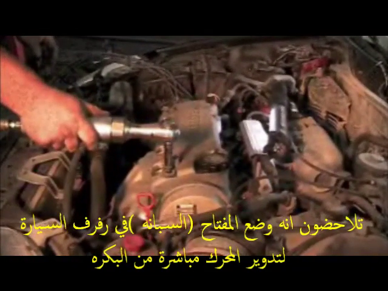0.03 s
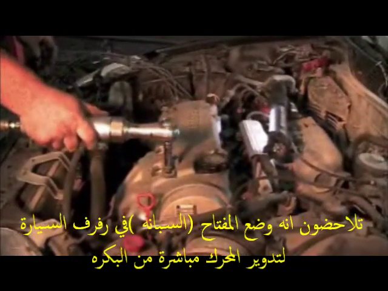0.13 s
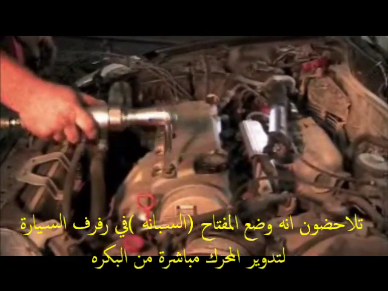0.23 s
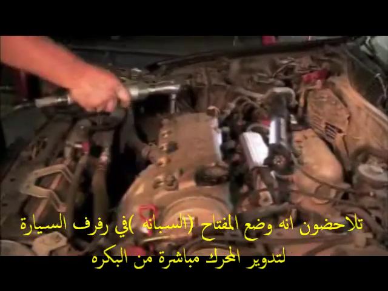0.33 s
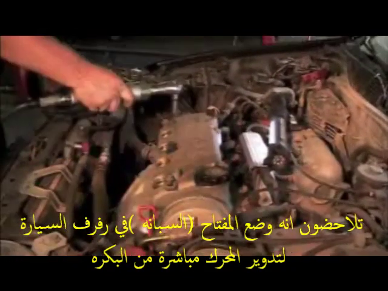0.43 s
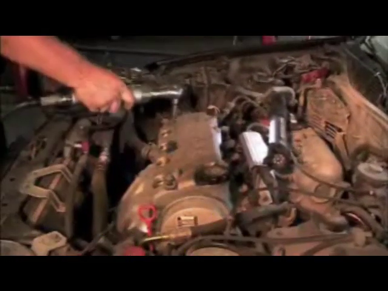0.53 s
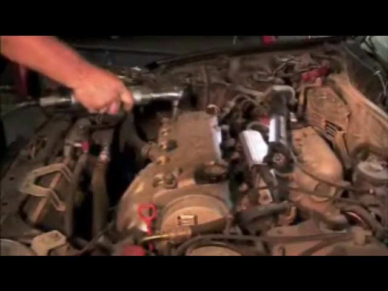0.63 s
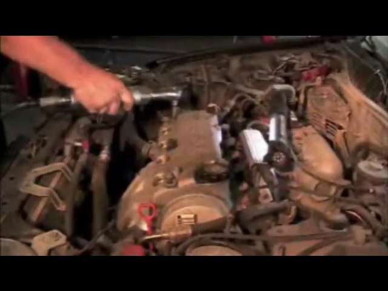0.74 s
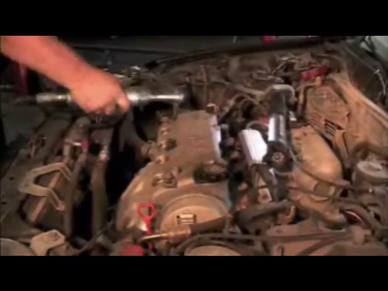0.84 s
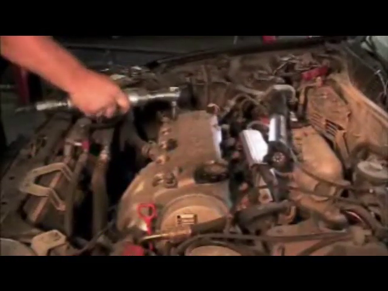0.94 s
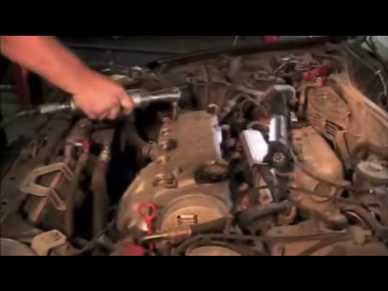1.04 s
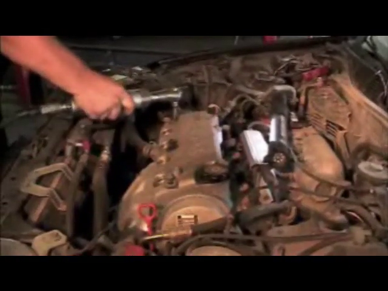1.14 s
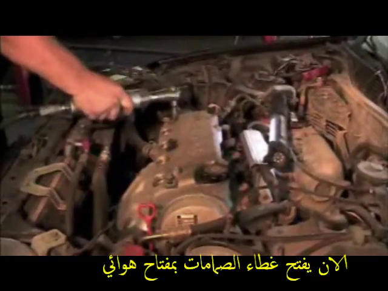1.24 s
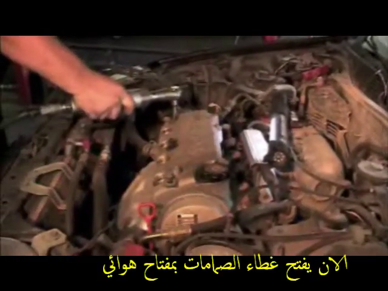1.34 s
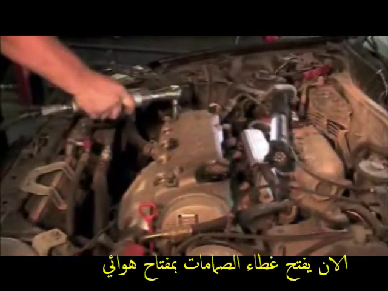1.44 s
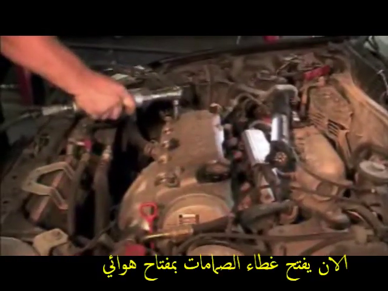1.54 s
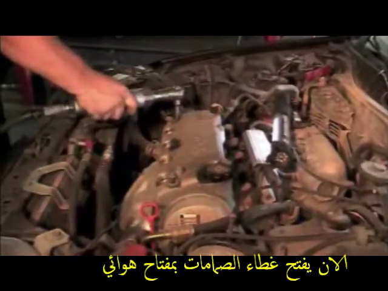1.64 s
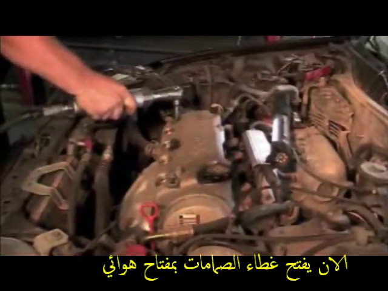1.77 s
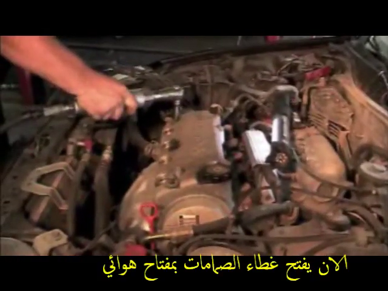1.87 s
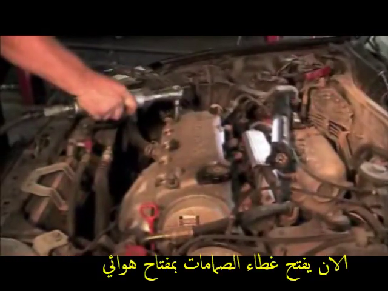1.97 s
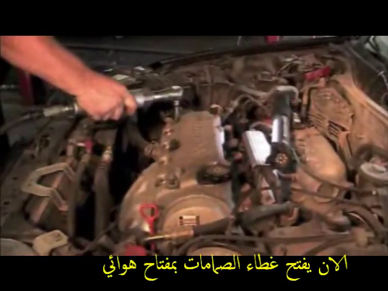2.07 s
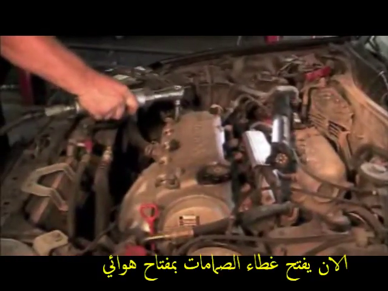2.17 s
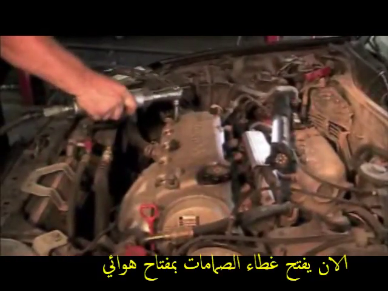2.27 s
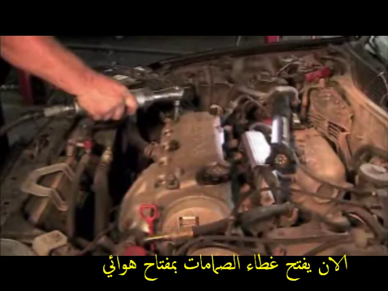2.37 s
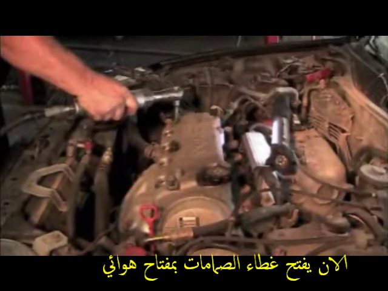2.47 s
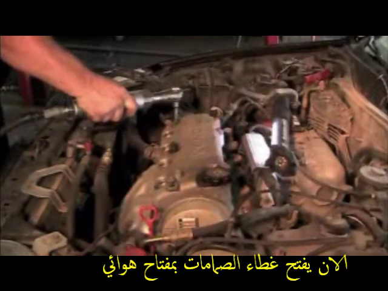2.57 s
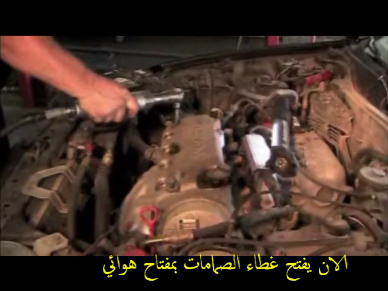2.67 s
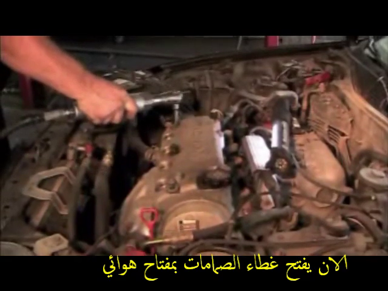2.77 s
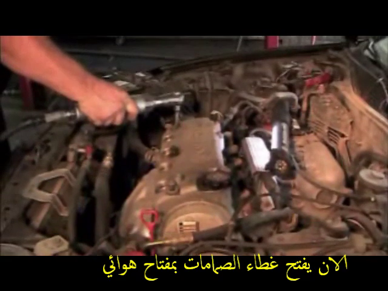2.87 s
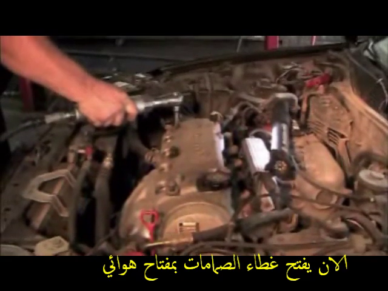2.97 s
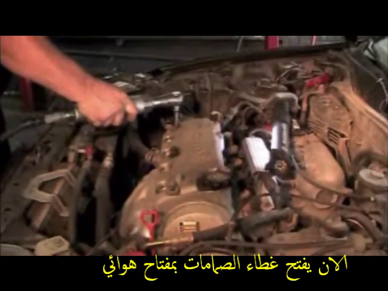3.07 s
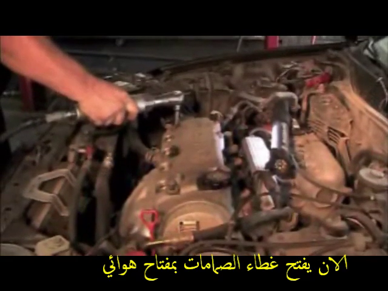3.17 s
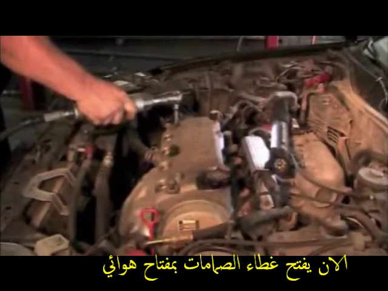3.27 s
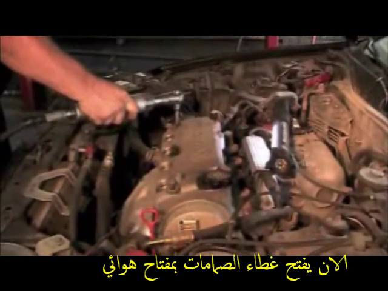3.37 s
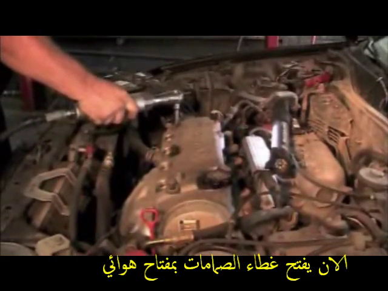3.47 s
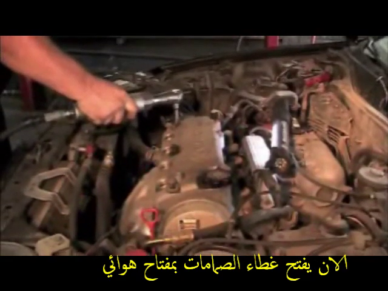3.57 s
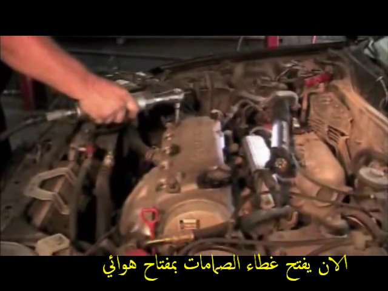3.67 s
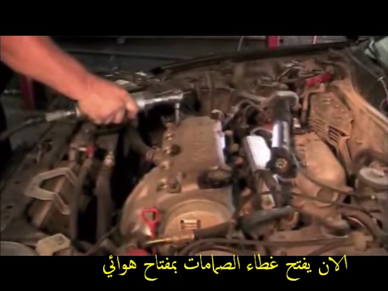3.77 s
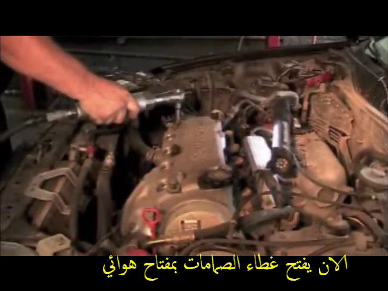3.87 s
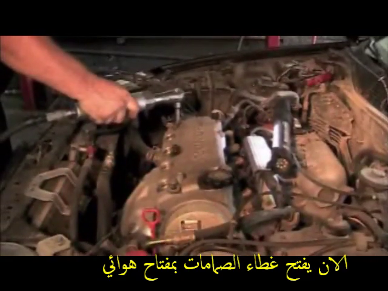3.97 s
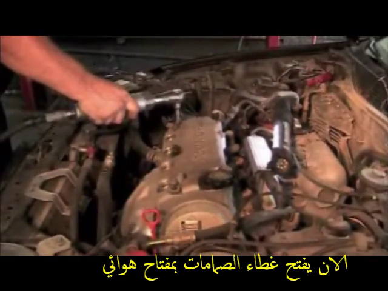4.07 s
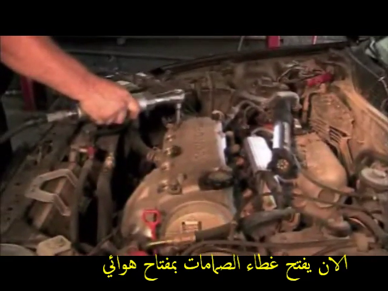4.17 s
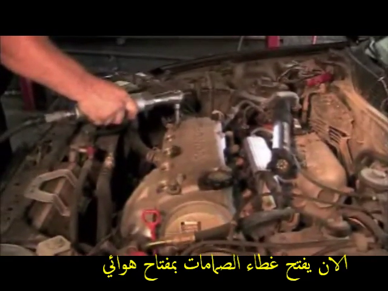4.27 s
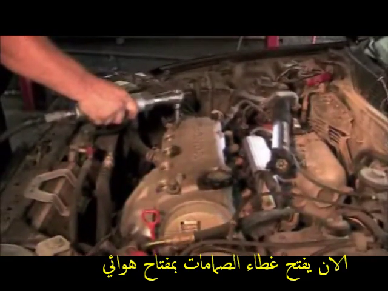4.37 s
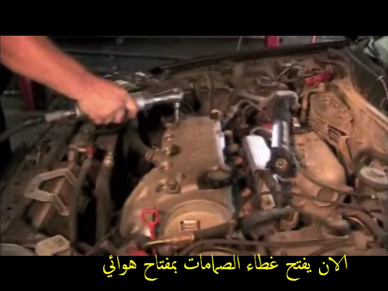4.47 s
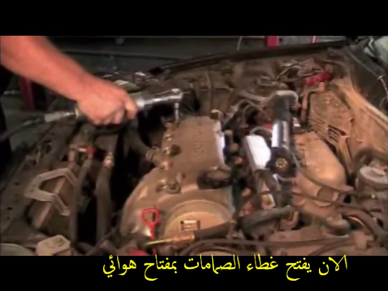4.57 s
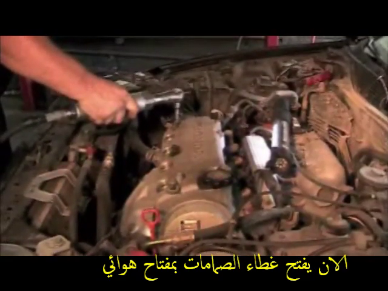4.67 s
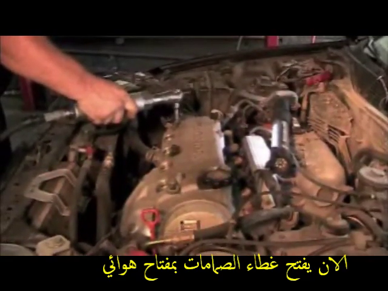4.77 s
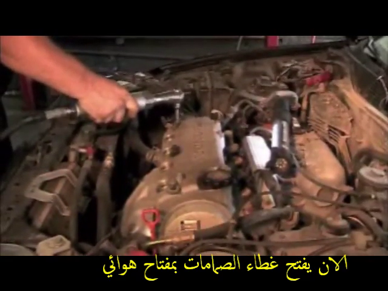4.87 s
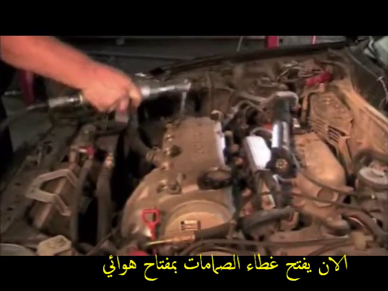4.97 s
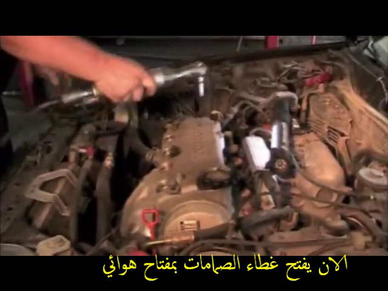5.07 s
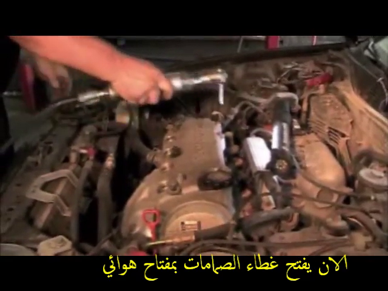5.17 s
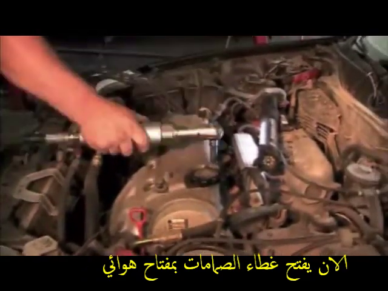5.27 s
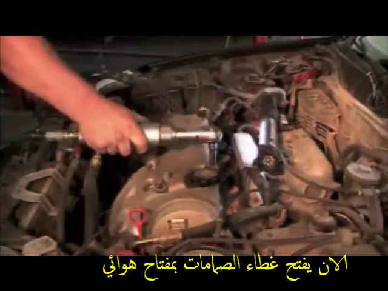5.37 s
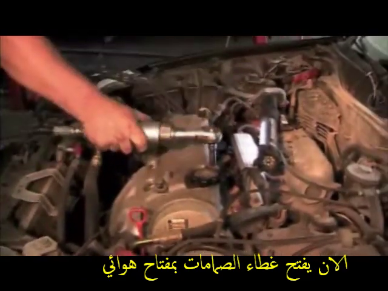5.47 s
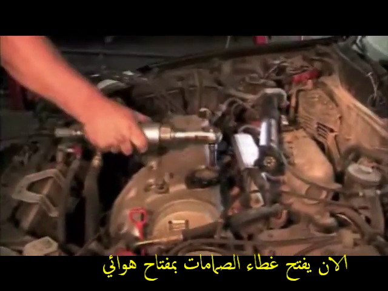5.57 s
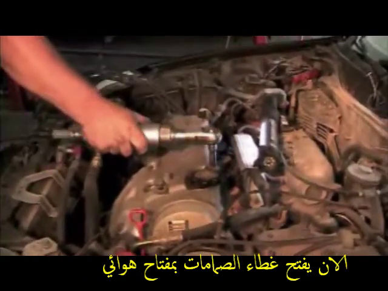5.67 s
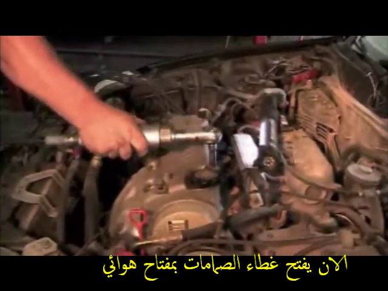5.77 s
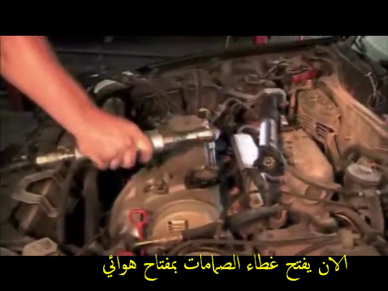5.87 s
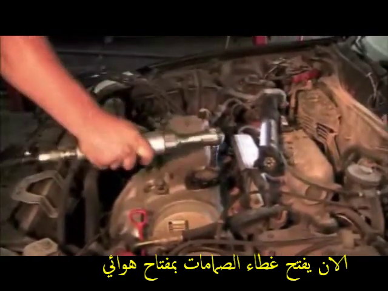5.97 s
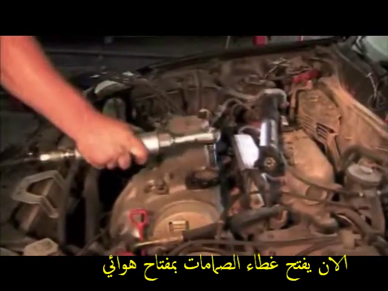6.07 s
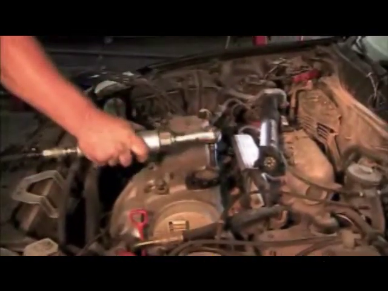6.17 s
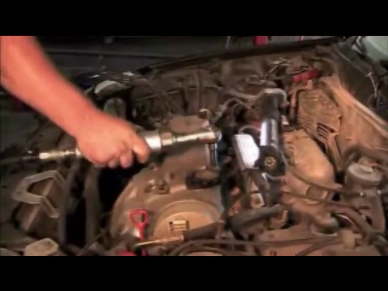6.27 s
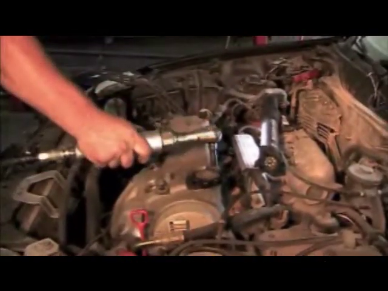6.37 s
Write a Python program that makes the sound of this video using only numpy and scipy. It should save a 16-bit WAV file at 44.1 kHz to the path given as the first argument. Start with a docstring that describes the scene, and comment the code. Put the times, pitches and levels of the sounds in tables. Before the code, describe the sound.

A compressed-air ratchet coasts down at once, its tail ringing in a hard workshop. After a dip in level, a socket clinks on a bolt and the throttle snaps. A steady, piercing whine with bright air hiss runs about four seconds, winds down, pauses briefly, then restarts with a stumbling, knocking struggle and continues to the end. Fairly close stereo pickup, the tool slightly right.

```python
"""An air ratchet winds down and rings on in a workshop; its socket clinks, then a long run whines and hisses.
After a short pause a last run stumbles on its bolt and is still going at the end; twice the level dips briefly.
The vanes chop the exhaust into a siren-like whine, turbulent air hisses, and at low speed puffs come out singly.
The pawl knocks the head once a stroke, harder under load; throttle and socket are damped modes with a crack.
A faint workshop background and a diffuse hall tail lie under it; loud sound lowers the overall gain."""
import sys
import numpy as np
from scipy import signal
from scipy.fft import rfft, irfft, next_fast_len
from scipy.io import wavfile
from scipy.ndimage import uniform_filter1d, map_coordinates

SR = 44100
rng = np.random.default_rng(int(sys.argv[2]) if len(sys.argv) > 2 else 0)


def materialize(psi):
    """Save the field psi as 16-bit PCM at rate SR to the path in sys.argv[1].

    A 1-D psi becomes a single channel; in a 2-D psi each row is a channel.
    """
    bounded = np.clip(np.atleast_2d(psi).T, -1, 1)
    quanta = np.round(bounded * 32767).astype(np.int16)
    wavfile.write(sys.argv[1], SR, quanta)


N = 282681
LEAD = SR // 3  # samples computed before t = 0, so that the first run can ring in
TIME = np.arange(-LEAD, N) / SR
COUNT = len(TIME)


def amp(db):
    """Decibels to gain."""
    return 10 ** (np.asarray(db) / 20)


def unit(x):
    """Scale to rms 1."""
    return x / np.sqrt(np.mean(x ** 2) + 1e-20)


def along(points, hz):
    """Interpolate (f/Hz, value) points on a log frequency axis."""
    f, v = np.transpose(points)
    return np.interp(np.log(hz + 1), np.log(f + 1), v)


def curves(rows):
    """One value per sample for each column after the time."""
    s, *cols = np.transpose(rows)
    return [np.interp(TIME, s, c) for c in cols]


def since(s):
    """Seconds elapsed after time s, zero before it."""
    return np.maximum(TIME - s, 0)


def wobble(knots_per_s):
    """Smooth random curve through normal knots."""
    knots = rng.standard_normal(int(COUNT * knots_per_s / SR) + 4)
    return map_coordinates(knots, [np.arange(COUNT) * knots_per_s / SR])


def filtered(x, response):
    """x through a response given as a function of frequency."""
    size = x.shape[-1]
    m = next_fast_len(size + SR // 2)
    return irfft(rfft(x, m) * response(np.fft.rfftfreq(m, 1 / SR)), m)[..., :size]


# left-right correlation of noise: (f/Hz, correlation)
NOISE_CORRELATION = [(100, 0.92), (2000, 1), (4500, 0.85), (8500, 0.99), (12500, 0.27)]


def rush(spectrum):
    """Stereo noise of rms 1; the mid/side split sets the correlation of left and right."""
    def mid_side_gain(hz):
        turn = np.arccos(np.clip(along(NOISE_CORRELATION, hz), -1, 1)) / 2
        return amp(along(spectrum, hz)) * [np.cos(turn), np.sin(turn)]

    mid, side = filtered(rng.standard_normal((2, COUNT)), mid_side_gain)
    return unit(np.array([mid + side, mid - side]))


# workshop background, relative spectrum: (f/Hz, density/dB per Hz)
BACKGROUND_SPECTRUM = [(20, -23), (45, -17), (70, -4), (140, 1), (250, -3.5), (500, -8.5), (1000, -11),
                       (2000, -17), (4000, -23.5), (9000, -18), (13000, -20)]


def background(level_db=-60):
    """Steady shaped noise of the workshop."""
    return amp(level_db) * rush(BACKGROUND_SPECTRUM)


# decay of the hall: (f/Hz, t60/s)
HALL_DECAY = [(150, 0.27), (900, 0.57), (3000, 0.77), (6000, 0.85), (12000, .42)]


def hall(x, level_db=-14, side_power=0.095):
    """Diffuse tail of decaying noise, each frequency dying at its own speed."""
    hz, t, z = signal.stft(rng.standard_normal((2, SR)), SR, nperseg=256)
    decay = amp(-60 * t / along(HALL_DECAY, hz)[:, None])
    mid, side = signal.istft(z * decay, SR, nperseg=256)[1]
    side = side * np.sqrt(side_power)
    tail = np.array([mid + side, mid - side])
    tail = np.pad(tail / np.linalg.norm(tail[0]), ((0, 0), (SR // 120, 0)))  # 8 ms predelay
    return amp(level_db) * signal.fftconvolve(x, tail, axes=1)[:, :COUNT]


def ring(modes, crack, crack_centre_hz):
    """One blow on steel: damped modes plus a short noise crack, peak 1."""
    t = np.arange(SR // 4) / SR
    tone = np.zeros(len(t))
    for k, (hz, db, t60_s) in enumerate(modes):
        tone += (-1) ** k * amp(db - 60 * t / t60_s) * np.sin(2 * np.pi * hz * t)
    grit = filtered(rng.standard_normal(len(t)), lambda hz: hz / (crack_centre_hz ** 2 + hz ** 2))
    blow = tone + crack * amp(-60 * t / 0.02) * unit(grit)
    # small parts radiate no deep bass
    blow = signal.sosfilt(signal.butter(2, 170, "high", fs=SR, output="sos"), blow)
    return blow / np.abs(blow).max()


def strikes(events, modes, crack, crack_centre_hz):
    """Single blows on one object at the listed times and peak levels."""
    out = np.zeros(COUNT)
    for s, db in events:
        blow = amp(db) * ring(modes, crack, crack_centre_hz)
        out[LEAD + round(s * SR):][:len(blow)] += blow
    return out


# socket meets bolt: (t/s, level/dB)
CLINKS = [(.365, -38.5), (.412, -47)]
# socket modes: (f/Hz, level/dB, t60/s)
SOCKET_MODES = [(1340, -2, 0.067), (1670, 2, 0.04), (1940, 1, .045), (2080, 8, 0.028), (2859, 0, 0.041),
                (2993, -1, 0.047), (3650, -5, 0.0295), (5356, -30, .04)]


def socket_clinks():
    """The hard socket rings in its modes as it meets the bolt."""
    return strikes(CLINKS, SOCKET_MODES, crack=.7, crack_centre_hz=2000)


# throttle valve snaps: (t/s, level/dB)
SNAPS = [(.544, -37), (.594, -14.5), (5.12, -25)]
# valve modes: (f/Hz, level/dB, t60/s)
VALVE_MODES = [(5400, -8, .03), (9300, 5.5, 0.032), (9750, -4, .03), (12900, -9, .03)]


def throttle_snaps():
    """The small valve snaps: high modes under a bright crack."""
    return strikes(SNAPS, VALVE_MODES, crack=1.1, crack_centre_hz=8000)


# tool runs: (throttle opens t/s, bolt gives t/s, throttle closes t/s, settled vane passes f/Hz,
#             hiss level/dB, opening time/s, puffs at stall level/dB re hiss)
RUNS = [(-.33, -.33, -.072, 1300, -26.5, .01, 0), (.586, .614, 4.677, 1326, -26.7, .006, 5.5),
        (5.069, 5.085, 7, 1295, -28.0, .021, 2)]
SPIN_UP_S, COAST_S = .033, .059  # rotor time constants
CREEP, FRICTION = .19, .07  # shares of full speed: before the bolt gives; lost to dry friction in coasting
HOSE_HZ, HOSE_DB, HOSE_S = 95, 2.5, .17  # air stored in the hose: faster, louder start
SAG_HZ, SAG_S = 45, 2.3  # slow sag of line pressure
VENT_DB_PER_S = 350  # fall of the hiss after the throttle closes
LEAK_S, LEAK_DB = .543, -44  # half-pressed throttle leaks until the bolt gives in the long run
CHUG_POWER = 1.5  # growth of puffs with lost speed
COAST_CHUG_DB, LEAK_CHUG_DB = 2.5, -6  # puffs re pumped air; puffs re leak


def motor(drag_hz):
    """Air rushes in, rotor spins up, sags, coasts; returns vane rate, air flow, pumped air, puff strength."""
    vane_hz, air, pumped, puffs = np.zeros((4, COUNT))
    for opens, gives, closes, settled_hz, db, opening_s, stall_db in RUNS:
        age = since(opens)
        hose = np.exp(-age / HOSE_S)
        free_hz = settled_hz + HOSE_HZ * hose + SAG_HZ * np.exp(-age / SAG_S)
        spin_up = np.maximum(1 - np.exp(-since(gives) / SPIN_UP_S), CREEP * (age > 0))
        coast = np.maximum((1 + FRICTION) * np.exp(-since(closes) / COAST_S) - FRICTION, 0)
        driven_hz = (free_hz - drag_hz) * spin_up
        flow_db = db + HOSE_DB * hose - VENT_DB_PER_S * since(closes)
        flow = amp(flow_db) * (1 - np.exp(-age / opening_s)) ** 2
        vane_hz += driven_hz * coast
        air += flow
        pumped += amp(db) * coast * (1 - coast)
        puffs += amp(stall_db) * flow * np.abs(1 - driven_hz / free_hz) ** CHUG_POWER
    leak = amp(LEAK_DB) * (TIME > LEAK_S) * (TIME < RUNS[1][1])
    puffs += amp(COAST_CHUG_DB) * pumped + amp(LEAK_CHUG_DB) * leak
    return vane_hz, air + leak, pumped, puffs


# puff, relative spectrum: (f/Hz, density/dB per Hz)
PUFF_SPECTRUM = [(30, -50), (70, -38), (160, -12.5), (350, -5.5), (620, 2), (1000, -2), (1350, -3.5),
                 (1800, -11.5), (4000, -15), (12000, -36)]


def chug(phase, puffs, depth=0.23):
    """At low speed every vane lets out a separate dull puff."""
    return puffs * unit(rush(PUFF_SPECTRUM) * (1 + depth * np.cos(phase)))


# exhaust hiss, relative spectrum: (f/Hz, density/dB per Hz)
HISS_SPECTRUM = [(30, -56), (60, -38), (125, -27.5), (420, -13.5), (1150, -13), (1520, -18), (1850, -7),
                 (2450, -1), (3700, -4), (4700, -2.5), (8000, -1), (9300, 1.5), (10700, -4), (12800, -3.5),
                 (14000, -26)]


def exhaust(phase, spurt, air_db, pulsing=0.075, flutter=0.093, echo=0.17, echo_s=.0081):
    """Turbulent air pulses with vanes and ratchet strokes, and glances off the engine bay."""
    pulse = 1 + pulsing * np.cos(phase) + flutter * np.cos(phase / 4)
    jet = rush(HISS_SPECTRUM) * (pulse + 0.36 * (spurt - spurt.mean()))
    jet = filtered(jet, lambda hz: 1 + echo * np.exp(-2j * np.pi * hz * echo_s))
    return amp(air_db + 0.68 * wobble(17)) * unit(jet)


# ratchet head modes: (f/Hz, level/dB, t60/s)
HEAD_MODES = [(170, -12.5, 0.052), (244, -8, 0.043), (335, -2, 0.038), (415, 0, 0.043), (477, -10, .03)]


def pawl(turns, load, level_db, scatter_db):
    """The pawl knocks once a stroke, harder under load; the greased head rings low."""
    at = np.flatnonzero(np.diff(np.floor(turns)) > 0)
    blows = np.zeros(COUNT)
    blows[at] = load[at] ** 1.49 * amp(level_db + scatter_db * rng.standard_normal(len(at)))
    knock = ring(HEAD_MODES, crack=.2, crack_centre_hz=750)
    return signal.fftconvolve(blows, knock)[:COUNT]


# whine up to the pause: (t/s, harmonics 1-5 level/dB re hiss)
LONG_WHINE = [(-.1, -5, -10, -15, -22, -20), (.64, 0, -7, -15, -22, -20), (.71, -3, -4.5, -14, -26, -13),
              (1.1, 1.5, -1.5, -15, -21, -14), (1.5, -1.3, -8, -7, -24, -14), (1.9, -1.3, -8, -7, -23, -17),
              (2.2, -1.8, -16, -6, -24, -10), (2.85, -1.8, -13, -19, -24, -8), (3.15, -1, -8, -10, -20, -7),
              (3.44, -1.5, -14, -13, -18, -7), (3.51, -.5, -2, -8, -21, -8), (3.7, -1, -4, -8, -23, -9),
              (4.66, -3.5, -4.5, -6.5, -15, -10)]
# whine in the last run: (t/s, harmonics 1-5 level/dB re hiss)
LAST_WHINE = [(5.1, 5, -5, -14, -8, -14), (5.23, -5, 4.5, -3.5, -6, -19), (5.31, 2, 6, -11, -26, -22),
              (5.37, 4.5, -7, -6, -28, -12), (5.56, 1, 0, -12, -28, -17), (5.71, 2.5, 4, -4, -6, -22),
              (5.86, 3, -2, -17, -19, -10), (5.98, 4, 3, -5, -15, -12), (6.4, .5, 2, -9, -11, -20)]
# weaker free-running tones from unequal vanes: (multiple of vane rate, level/dB re hiss)
OVERTONES = [(.75, -31), (1.5, -30.5), (1.75, -35), (6, -19), (7, -16)]
PUMP_DB = 27.5  # hoot of the coasting rotor, re pumped air
WANDER_DB, LABOUR_DB = 1.2, 3.2  # waver as the hand moves; break-up while the rotor is held back
TONE_SPEED, DULL_DB = .25, 20  # speed share where the whine sets in; upper-harmonic loss near standstill


def whine(phase, swing, load, air_db, speed, pumped, throb_db=2.0):
    """Vanes chop the exhaust like a siren; strokes make it throb under load, free running adds overtones."""
    shake_db = 1.6 * load * wobble(280)
    throb = throb_db * load * unit(swing)
    out = amp(PUMP_DB) * pumped * speed ** 3 * np.sin(phase)
    for k, db in enumerate(curves(LONG_WHINE + LAST_WHINE), 1):
        flutter_db = 1.8 * load * wobble(140)
        # strokes and hand act half as much on the fundamental
        sway_db = (throb + WANDER_DB * wobble(12)) * min(k, 2) / 2
        labour_db = LABOUR_DB * np.tanh(8 * (1 - speed)) * load * wobble(90)
        dull_db = DULL_DB * (1 - speed) * (k > 1)
        level_db = air_db + db + shake_db + flutter_db + sway_db + labour_db - dull_db
        out += amp(level_db) * np.sin(k * phase)
    for k, db in OVERTONES:
        out += amp(air_db + db + 2.5 * wobble(5)) * (1 - load) * speed ** 2 * np.sin(k * phase)
    return np.sqrt(2) * out * np.tanh((speed / TONE_SPEED) ** 3)


# tool at the two microphones: (f/Hz, right over left level/dB)
TOOL_PAN = [(200, 1.2), (600, 1.4), (1330, 2), (2600, 0), (4000, 0), (8000, 2)]


def placed(x, lead_rad=0.26):
    """Off-centre tool: the ports differ in level and, above the bass, by lead_rad in phase."""
    sides = np.array([[-.5], [.5]])

    def port_gain(hz):
        shift = np.exp(-1j * sides * lead_rad * np.tanh(hz / 600))
        return amp(sides * along(TOOL_PAN, hz)) * shift

    return filtered(x, port_gain)


# bolt drag up to the pause: (t/s, speed lost f/Hz, load 0-1)
FIRST_BOLT = [(.58, 0, .1), (.61, 0, 1), (.72, 0, .55), (.76, 48, .4), (.81, 0, .12)]
# bolt drag in the last run: (t/s, speed lost f/Hz, load 0-1)
SECOND_BOLT = [(5.06, 0, .12), (5.1, 270, .66), (5.22, 205, .72), (5.275, 190, .85), (5.33, 35, .62),
               (5.4, 17, .65), (5.56, 66, .92), (5.6, 8, .22), (5.72, 0, .14), (5.86, 24, .12),
               (5.98, 0, .08)]
# hiss swell as the tool turns in the last run: (t/s, level/dB)
HISS_SWELL = [(5.25, 0), (5.32, -2), (5.45, .8), (5.65, 0), (5.9, 2), (6.05, -.7)]


def ratchet():
    """One rotor drives whine, hiss and pawl; sixteen vanes pass for each stroke of the head."""
    drag_hz, load = curves(FIRST_BOLT + SECOND_BOLT)
    load = np.clip(load, 0, 1)
    steady_hz, air, pumped, puffs = motor(drag_hz)
    air_db = 20 * np.log10(air + 1e-9)
    speed = np.clip(steady_hz / RUNS[1][3], 0, 1)  # re settled long run
    # the bolt's drag makes the rotor stumble
    vane_hz = steady_hz * (1 + 0.00076 * wobble(60)) + 25 * load * wobble(300)
    phase = 2 * np.pi * np.cumsum(vane_hz) / SR
    turns = phase / (2 * np.pi * 16)
    swing = np.sin(2 * np.pi * turns)
    # each stroke sways the rotor phase and lets out a spurt of air
    tone = whine(phase + 0.073 * load * swing, swing, load, air_db, speed, pumped)
    spurt = np.exp(-(turns % 1) / .15)
    knocks = pawl(turns, load * air, level_db=7.5, scatter_db=3.0)
    hiss = exhaust(phase, spurt, air_db + curves(HISS_SWELL)[0])
    hiss = hiss * amp([[-.15], [.15]])  # left, right
    return placed(tone + knocks + chug(phase, puffs)) + hiss


def gain_control(x, aim_db=-22.5, slope=0.38, release_db_per_s=28, boost_db=8):
    """Gain drops at once on loud sound and creeps back up in the pauses."""
    power = np.abs(uniform_filter1d(np.mean(x ** 2, axis=0), size=1500))
    level_db = 10 * np.log10(power + 1e-12)
    release_db = release_db_per_s * TIME
    held_db = np.maximum.accumulate(level_db + release_db) - release_db
    return x * amp(np.clip(slope * (aim_db - held_db), 0, boost_db))


# overall level dips: (t/s, level/dB, fade-out/s, fade-in/s)
DIPS = [(.168, -26, .11, .22), (5.052, -22, .15, .023)]


def dips():
    """Overall gain fades down and straight back up."""
    gain = np.ones(COUNT)
    for s, db, out_s, in_s in DIPS:
        gain *= np.interp(TIME, [s - out_s, s, s + in_s], [1, amp(db), 1])
    return gain


def scene():
    """Tool and small contacts in the hall over the background, then gain control and dips."""
    direct = ratchet() + socket_clinks() + throttle_snaps()
    sound = background() + hall(direct) + direct
    return (gain_control(sound) * dips())[:, LEAD:]


def record(dry, top_hz=13350):
    """Steep low-pass, half amplitude at top_hz."""
    return filtered(dry, lambda hz: 1 / (1 + (hz / top_hz) ** 120))


dry = scene()
out = record(dry)
materialize(out)
```